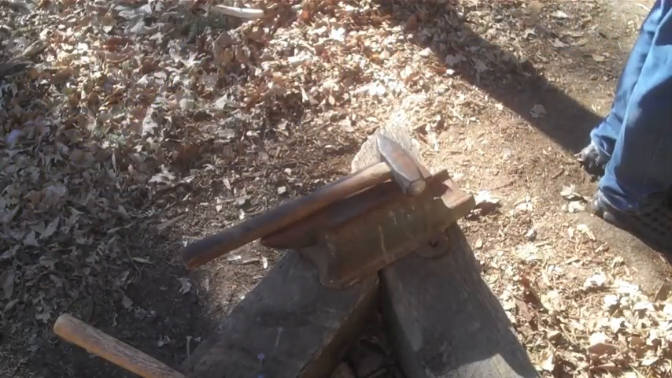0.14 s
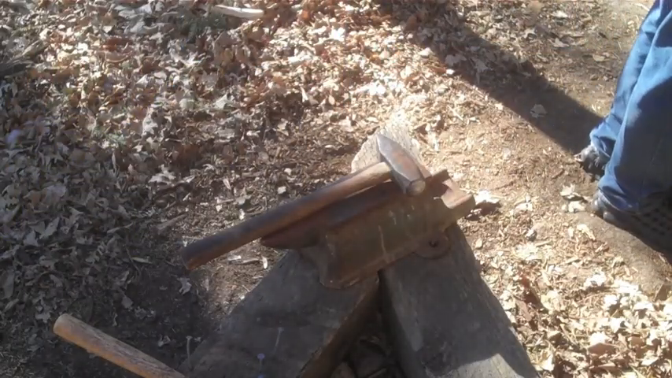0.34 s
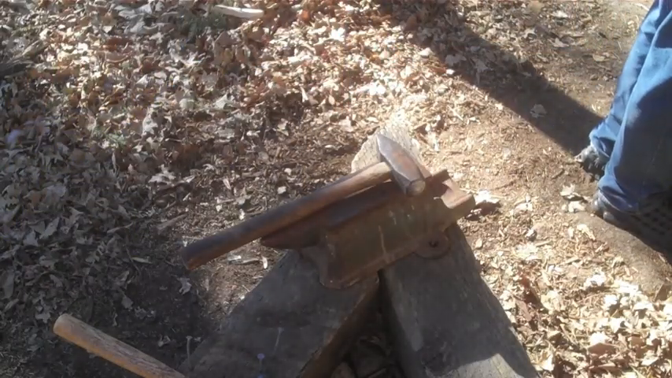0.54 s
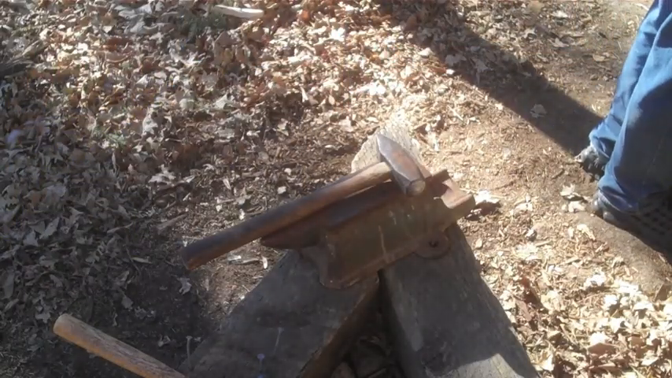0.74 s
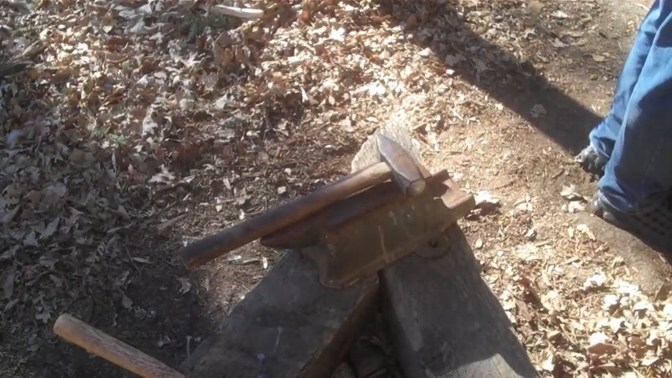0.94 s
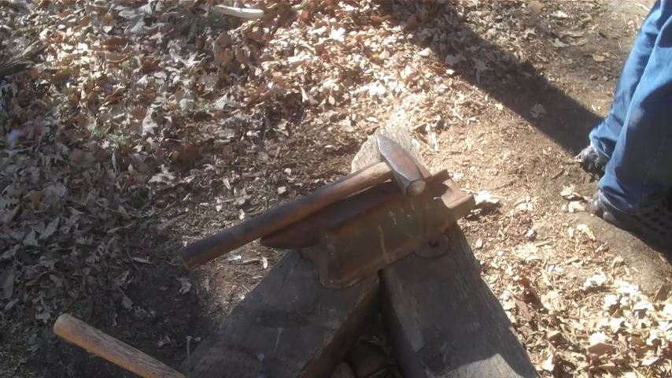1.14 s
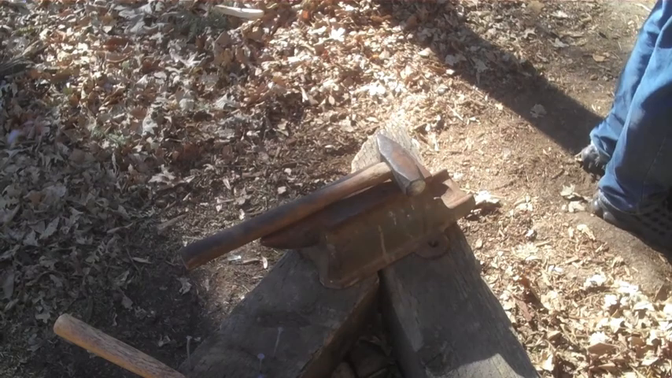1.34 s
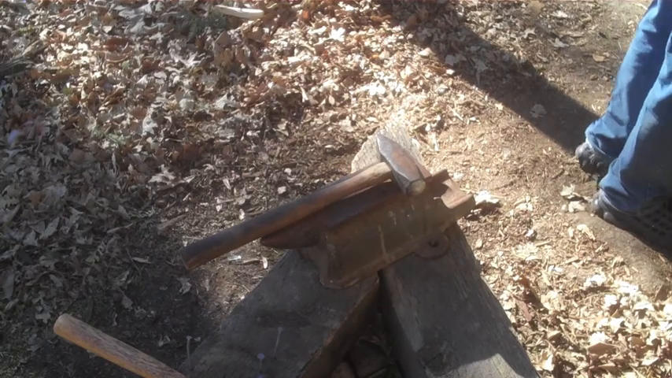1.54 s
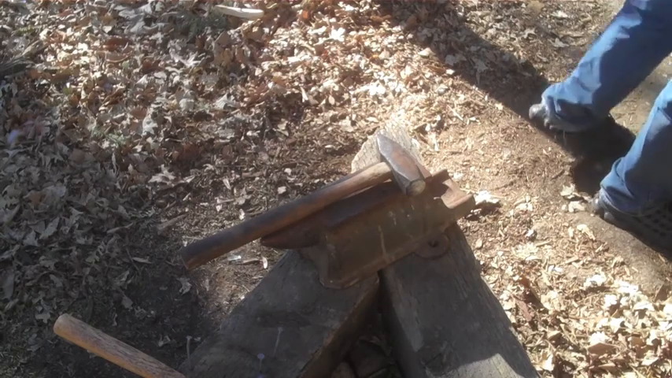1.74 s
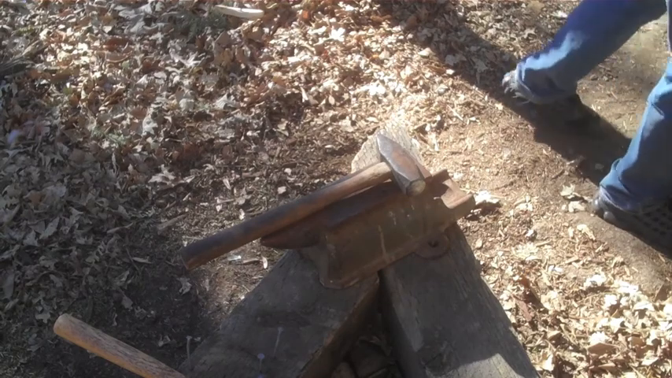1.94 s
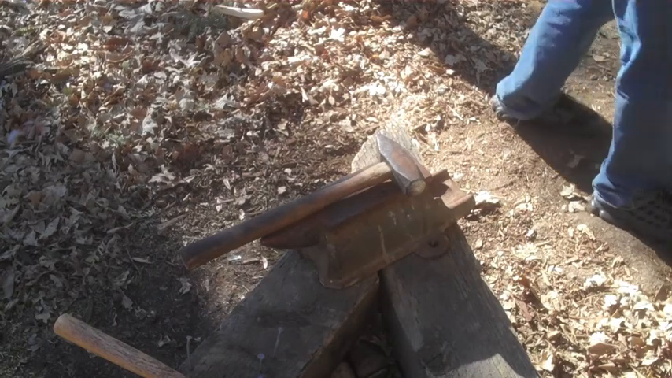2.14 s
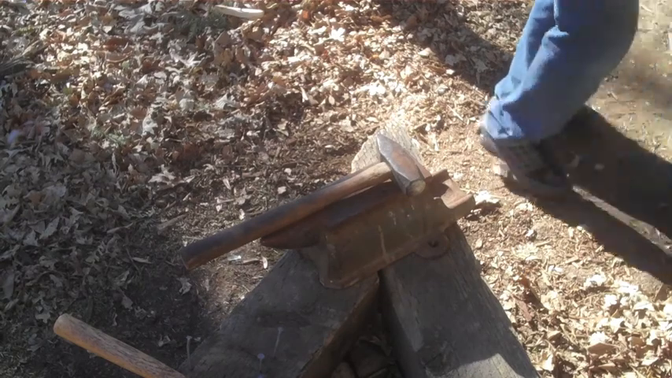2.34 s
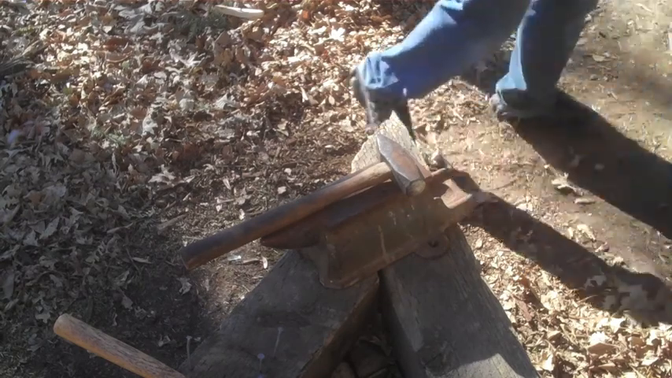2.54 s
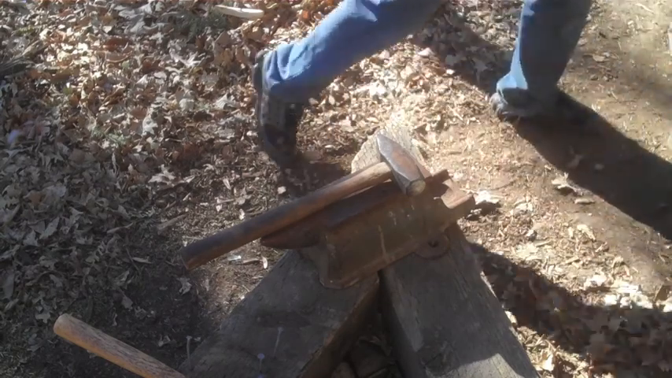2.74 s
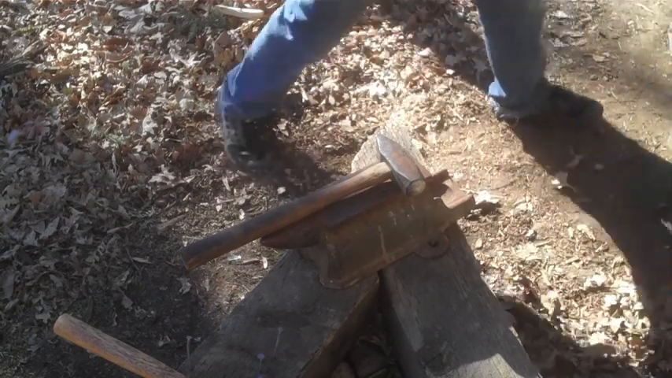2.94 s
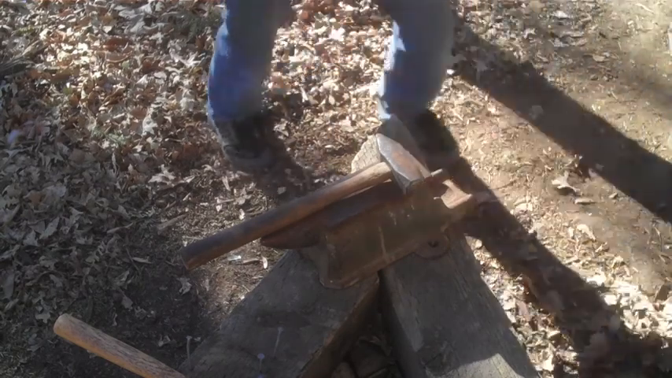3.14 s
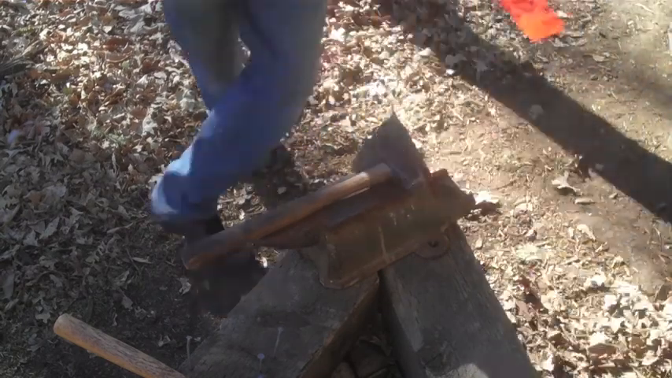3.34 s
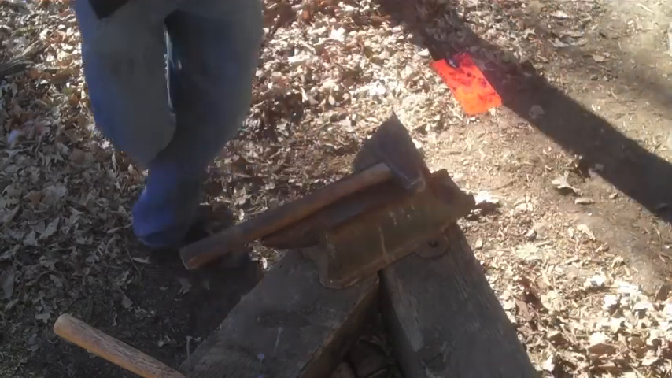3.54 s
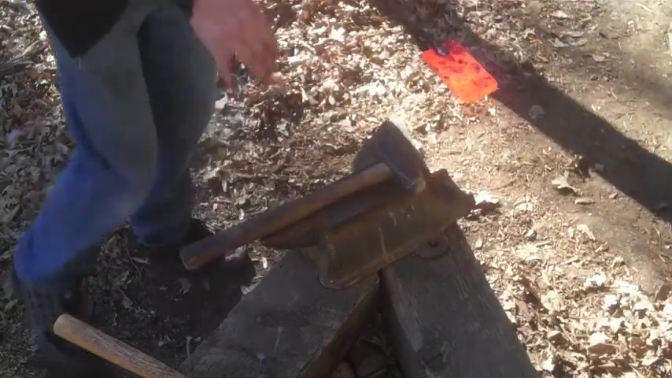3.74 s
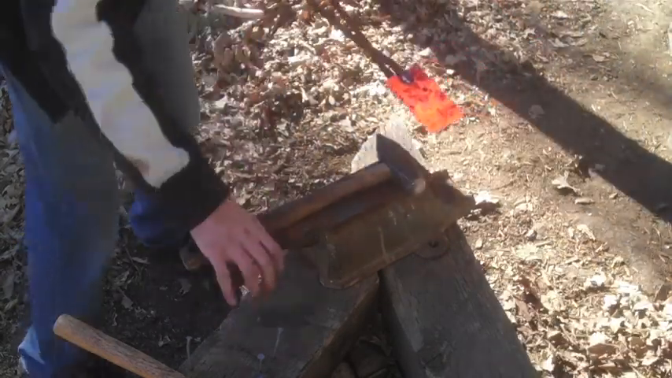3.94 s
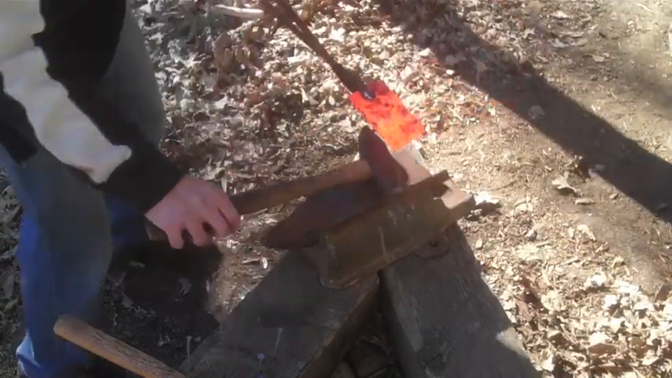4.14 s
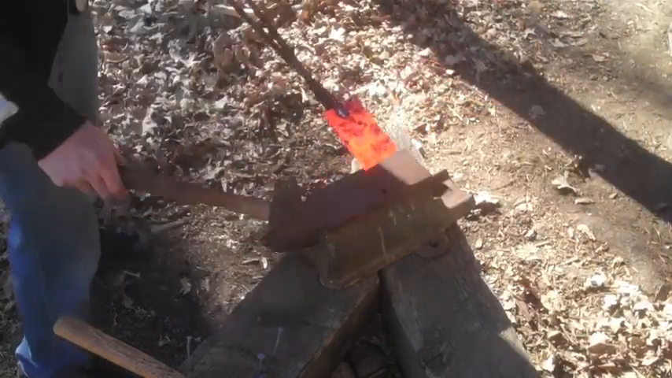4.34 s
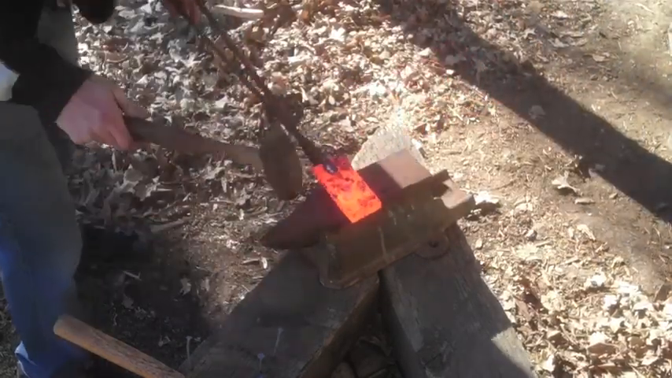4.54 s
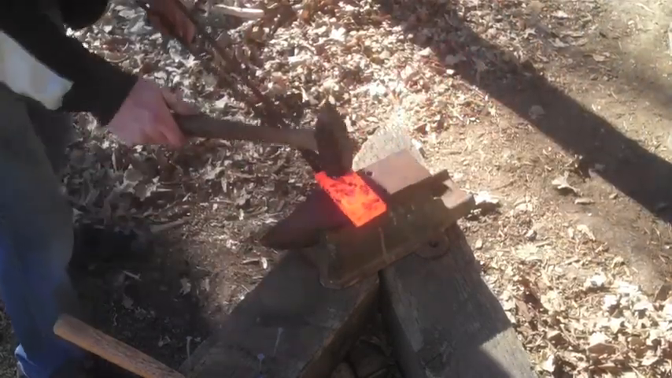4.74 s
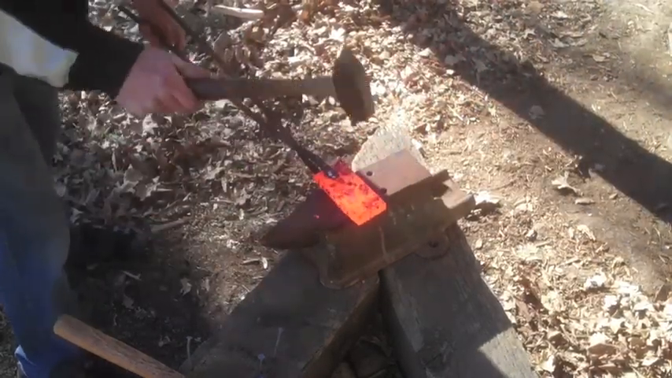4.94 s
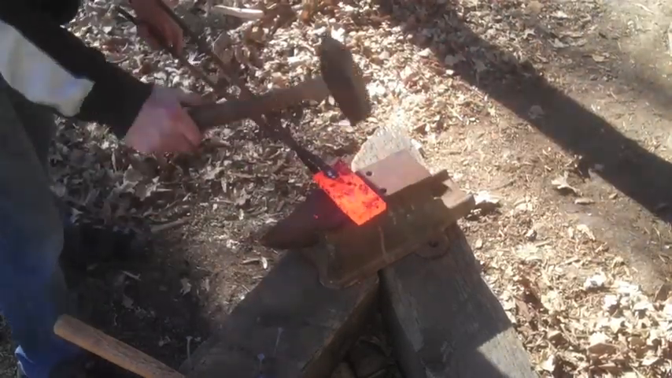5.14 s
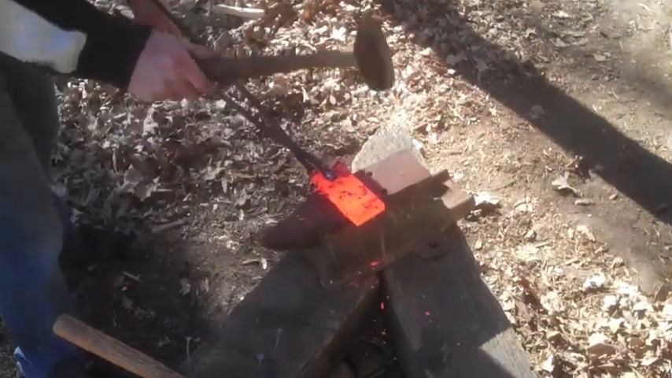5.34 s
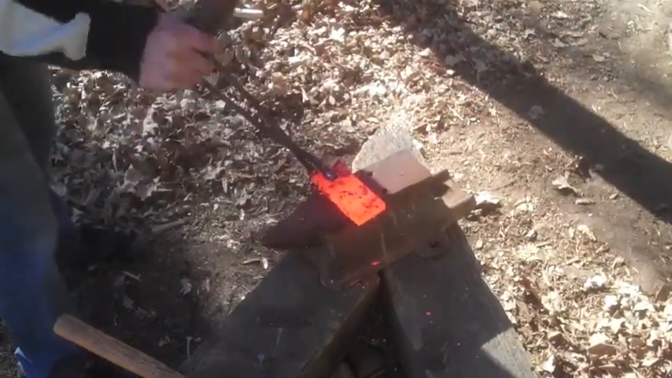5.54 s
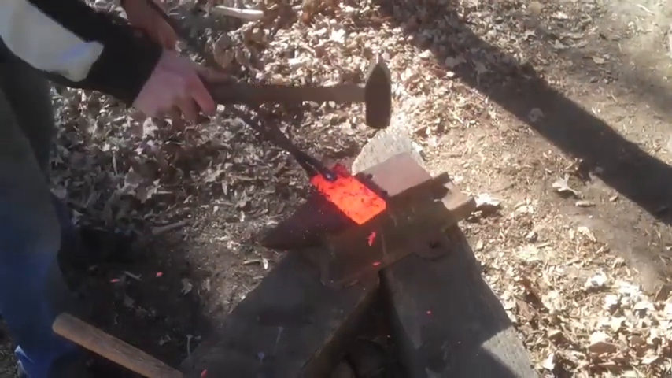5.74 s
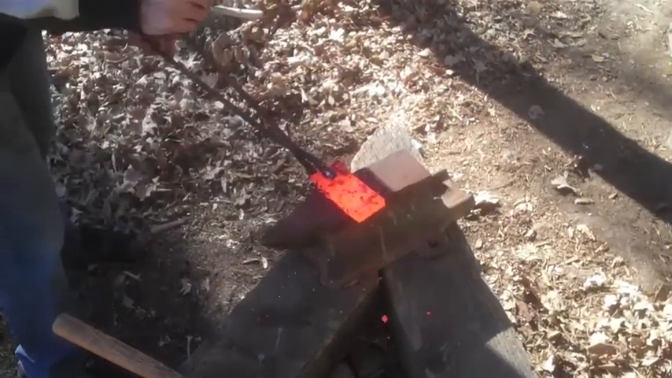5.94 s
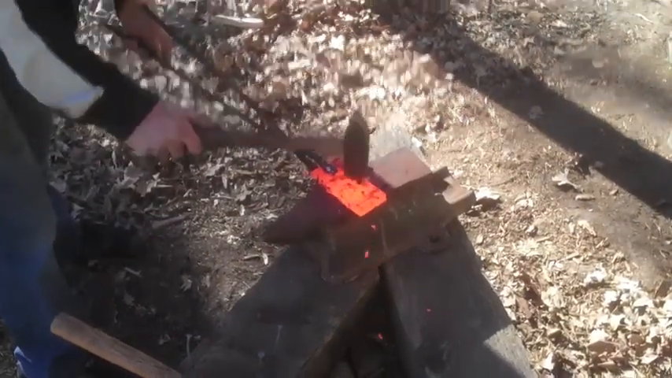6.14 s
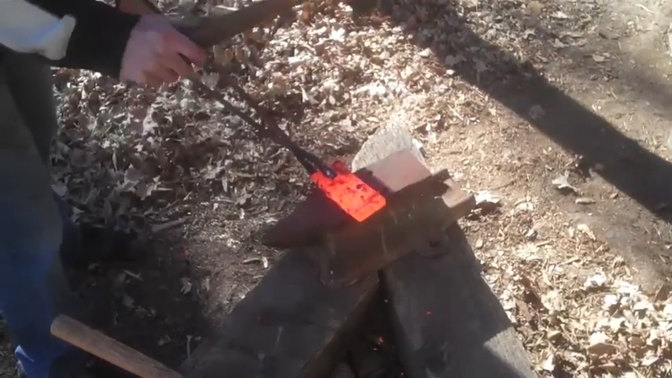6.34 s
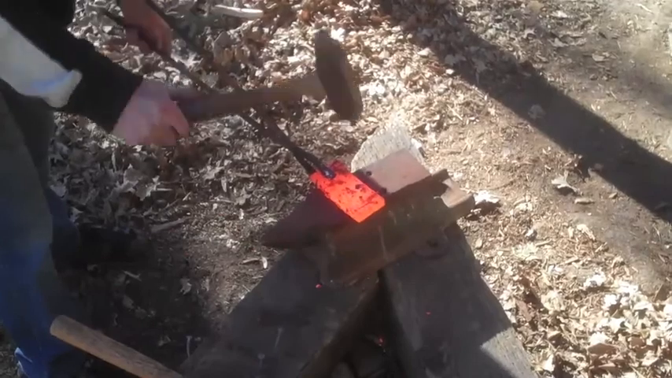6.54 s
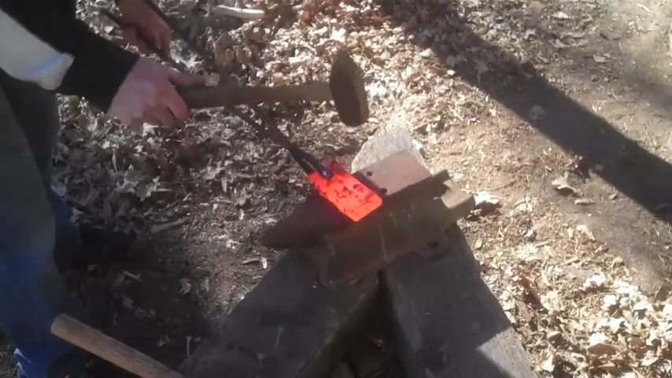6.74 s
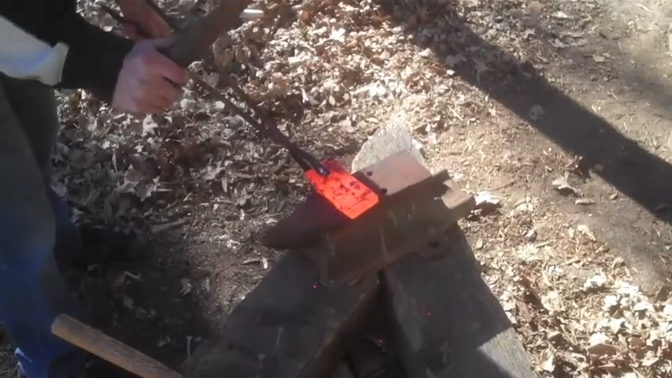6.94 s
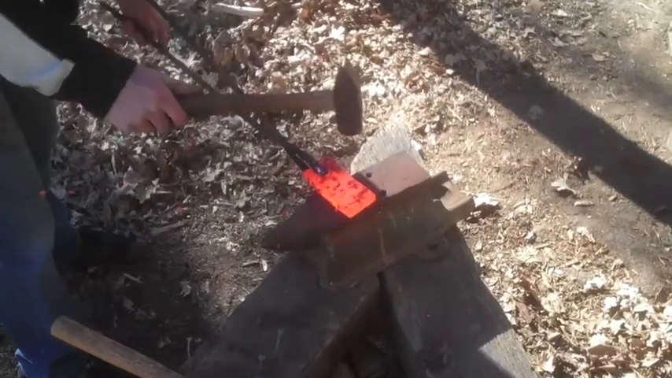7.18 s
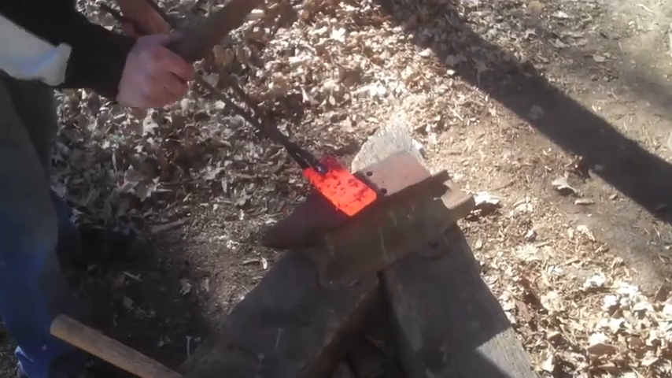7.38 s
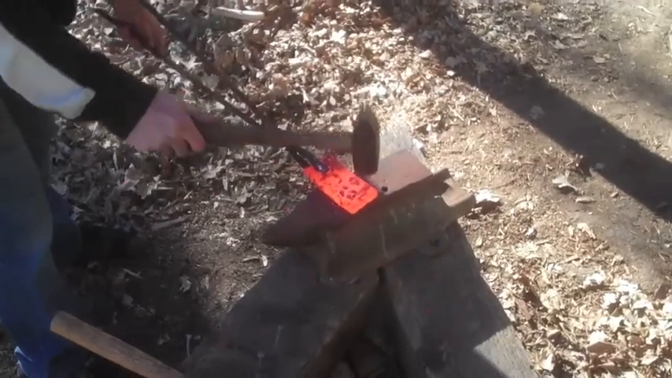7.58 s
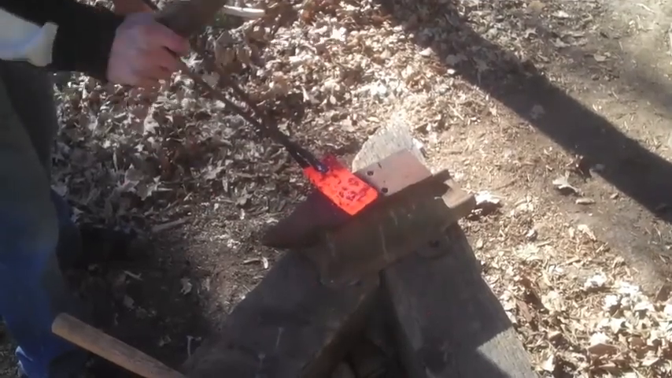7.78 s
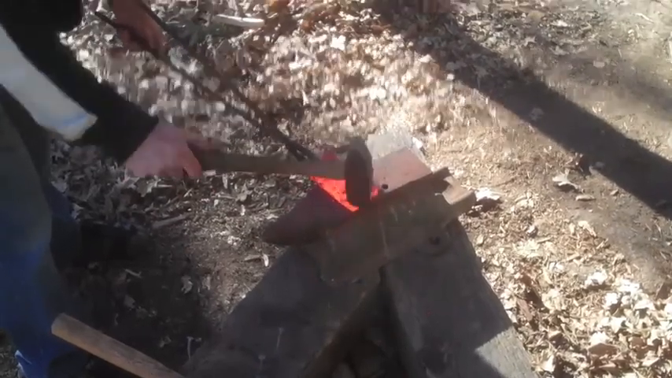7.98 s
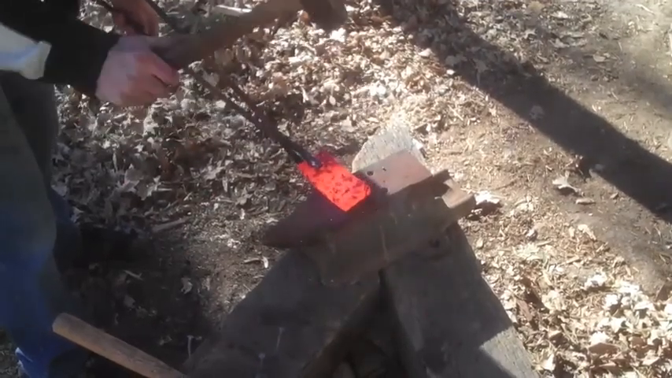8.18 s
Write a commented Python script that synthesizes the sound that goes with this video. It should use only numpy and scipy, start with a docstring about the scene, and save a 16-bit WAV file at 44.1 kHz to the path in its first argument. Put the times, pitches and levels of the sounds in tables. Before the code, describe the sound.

Footsteps crunch through dry leaves with a few fire pops, a hammer clanks on a small anvil, then seven ringing blows land, steadily spaced and weakening.

```python
"""A smith steps through dry leaves, scuffing and crackling (clumped noise grains), over a murmur of moving air.
Twigs tick (short noise bands) and bumped tools knock (blurred notes) throughout; early on a fire pops (noise
bursts). At a small anvil outdoors he picks up the hammer with a loud clank: crack, ringing modes, stand's thud.
Steel slides (grating noise and resonances) as he lays the hot piece down in its tongs and strikes it seven
times; scale patters down. The blows overload the close microphone, and the trees answer faintly."""
import sys
import numpy as np
from scipy import signal
from scipy.fft import rfft, irfft, next_fast_len
from scipy.io import wavfile
from scipy.ndimage import map_coordinates

SR = 44100
rng = np.random.default_rng(int(sys.argv[2]) if len(sys.argv) > 2 else 0)


def int16_out(signal):
    """Quantize to a 16-bit WAV file."""
    q = np.round(np.clip(np.atleast_2d(signal).T, -1, 1) * 32767)
    wavfile.write(sys.argv[1], SR, q.astype(np.int16))


N = 362061  # length [samples]

# All levels in the tables are relative mix levels.
# a foot shifts or lands in the leaves: (time of full weight [s], scuff level [dB], leaf rustle level [dB],
# rise over 20 dB [s], fall over 20 dB [s])
STEPS = [(0.012, -62.5, -40.5, 0.031, 0.044), (0.15, -53, -58.5, 0.26, 0.32),
         (0.52, -54, -55, 0.027, 0.0446), (0.645, -56.5, -54, 0.0265, 0.12),
         (0.77, -61, -50, 0.034, 0.3339), (0.95, -57.5, -41.5, 0.025, 0.0735),
         (1.11, -50.5, -62, .06, 0.16), (1.585, -50, -55.5, 0.104, 0.0917), (1.9, -56, -58, 0.021, 0.1573),
         (2.2, -52.5, -41, 0.0646, 0.0965), (2.233, -32.5, -36.5, 0.0079, 0.0933),
         (2.385, -61.5, -39.5, 0.022, 0.08), (2.569, -54, -61, 0.0106, 0.0547),
         (2.8, -62, -48.5, 0.106, 0.04), (2.99, -55.5, -41.5, 0.109, 0.1121),
         (3.06, -46.5, -34.5, 0.0686, 0.1086), (3.3, -57.5, -47.5, 0.092, 0.25),
         (3.37, -45.5, -50, 0.0605, 0.0066), (3.418, -43.5, -43, 0.016, 0.11),
         (3.58, -55, -43, 0.205, 0.2222), (3.87, -46.5, -44, 0.1025, 0.136)]
# leaf litter that keeps stirring until the smith stands still: (time [s], rustle level [dB])
LITTER_STIR = [(0, -64.5), (1.4, -64.5), (1.8, -75), (2.1, -58.5), (2.65, -64.5), (3.3, -59), (4.4, -61),
               (5.7, -57.5), (6.5, -68), (7.4, -72.5), (8.2, -76)]
STIR_SCUFF_DB = -13  # dirt against leaves, ahead of the scuff boost in the mix
# spectra of crushed leaves and scuffed dirt: (frequency [Hz], level per Hz [dB])
LEAF_SPECTRUM = [(500, -30), (1200, -2.5), (3600, 1), (6000, -1.5), (8000, -6), (11500, -17),
                 (13000, -33.5), (15000, -59.5)]
SCUFF_SPECTRUM = [(60, -14), (200, -13), (400, -4.5), (700, 0.5), (1000, 1), (1500, -4.5), (2000, -6.5),
                  (3000, -11.5), (6000, -39)]
# the low outdoor murmur over time: (time [s], level [dB])
MURMUR_LEVEL = [(0, -60.5), (1.3, -60), (1.7, -66.5), (3.9, -63.5), (4.45, -67), (5.0, -60), (6.5, -71),
                (7.4, -77), (8.2, -75)]
# spectrum of the moving air: (frequency [Hz], level per Hz [dB])
AIR_SPECTRUM = [(12, -32.5), (20, -1.5), (72, 2.5), (139, -10), (256, -5.5), (398, -10), (620, -11),
                (1350, -19.5), (7930, -23.5), (12000, -31), (15000, -75.5)]
# soft knocks of tools being handled: (time [s], level [dB], pitch [Hz], 60 dB decay [s])
KNOCKS = [(0.052, -36.5, 1439, 0.114), (0.222, -38.5, 690, 0.128), (2.57, -42.5, 2753, 0.204),
          (5.126, -39, 849, .1), (7.492, -42, 1500, 0.0378)]
# the loudest snaps of leaves, twigs and flakes of scale: (time [s], level [dB], centre frequency [Hz])
SNAPS = [(0.1356, -26.5, 3200), (0.643, -35.5, 3480), (0.9393, -29.5, 5160), (1.089, -35, 3950),
         (1.130, -27.5, 6240), (1.2466, -40, 4100), (1.6564, -34.5, 2950), (1.9031, -26.5, 3250),
         (1.9586, -37.5, 4620), (1.9921, -38, 5000), (2.147, -29.5, 2160), (2.235, -23, 3040),
         (2.383, -25.5, 5800), (2.9801, -23.5, 6360), (3.0011, -18, 6240), (3.4143, -28.5, 2980),
         (3.5885, -16, 4680), (3.8043, -29, 5000), (4.6418, -33, 3670), (4.6557, -35.5, 3180),
         (4.9556, -36, 3100), (5.1071, -31.5, 3834), (5.3199, -29.5, 3600), (5.365, -30.5, 4584),
         (5.5277, -33.5, 7000), (5.5542, -35, 2920), (5.7334, -26, 3280), (5.7674, -24.5, 3555),
         (5.7825, -22, 3295), (6.2502, -31.5, 2600), (6.316, -36.5, 5580), (6.3456, -35, 2806),
         (6.9033, -45.5, 3666), (6.9575, -45, 3450)]
# the break itself; the crumbs that follow
SNAP_T60_S, SNAP_TAIL_DB, SNAP_TAIL_T60_S = 0.01124, -25, 0.089
TICK_HZ, TICK_OCTAVES = 4000, .45  # centre of the small ticks and its spread
LITTER_DB, LITTER_UNTIL_S = -45, 5.5  # small ticks of leaves settling underfoot
# least thud that throws scale; a flake against the thud; spread of all the small ticks
FORGING_DB, FLAKE_DB, TICK_SCATTER_DB = -15, -42, 2.5
# shortest and longest flight; late flakes land farther away
FLIGHT_S, FLAKE_FADE_DB_PER_S = (0.074, 0.38), 20
# pops of the fire: (time [s], peak level [dB], level of the spray that follows [dB])
POPS = [(1.395, -2.5, -37), (1.397, -10, -30.5), (1.4955, -16, -45.5)]
# spectrum of a pop: (frequency [Hz], level per Hz [dB])
POP_SPECTRUM = [(35, -38.5), (60, -7), (526, -10), (1030, -6.5), (1270, -12), (3120, -1), (9020, -4.5),
                (13100, -15), (15000, -31.5)]
# steel on steel: (time [s], thud level [dB], thud pitch [Hz], crack level [dB], main ring level [dB],
# centre modes level [dB], overtones level [dB], tongs level [dB])
BLOWS = [(4.001, -47, 356, -37, -38, -63, -57, -51.5), (4.021, -27.5, 375, -35.5, -25, -52.5, -48, -45),
         (4.0761, -18, 164, 3.5, 10.5, -10.5, -15, -21), (4.170, -36, 352, -47, -21.5, -54.5, -57, -44.5),
         (4.2532, -28.5, 336, -27.5, -24.5, -37.5, -31, -27),
         (4.572, -27.5, 339, -29, -34.5, -59.5, -48.5, -33), (4.829, -5, 299.7, -20, -26.5, -39, -31, -28),
         (5.209, 4, 359.3, 9.5, 10.5, -16.5, -16, -15.5), (5.658, 4, 366.4, 3.5, 2.5, -16, -22.5, -25.5),
         (6.1335, 0.5, 373.1, 4, 3, -26, -12.5, -23), (6.606, -6, 351.7, -4, -8.5, -40, -25, -32.5),
         (7.068, -9.5, 373, -4.5, -21.5, -46.5, -16, -41), (7.517, -9, 365.7, -8, -15, -44.5, -19, -35),
         (7.9681, -9.5, 372, -7.5, -11.5, -37, -22, -36.5)]
RING_HZ = 2311  # main mode of the anvil
# anvil overtones, strongest under a blow near the edge: (frequency [Hz], level [dB], 60 dB decay [s])
ANVIL_OVERTONES = [(2466, -1, .15), (2512, -7, .15), (3165, -11, .14), (3600, 0, .125), (3622, -12, .16),
                   (3720, -10, .13), (4441, -7, .135), (4759, -19, .11), (5187, -14, .13), (5622, -11, .13),
                   (5983, -19, .1), (7381, -20, .11), (7830, -23, .08)]
# modes that join the main one under a central blow: (frequency [Hz], level [dB], 60 dB decay [s])
CENTRE_MODES = [(3299, 0, .21), (4038, -7, .12), (4450, -5, .08), (6334, -11, .08)]
# the tongs with the workpiece: (frequency [Hz], level [dB], 60 dB decay [s])
TONGS_MODES = [(980, -7, .15), (1208, -1, .18), (1373, -11, .15), (1451, -5, .16), (1792, -4, .21),
               (1925, -13, .17), (1981, -12, .11)]
# the timber stand: (frequency [Hz], level [dB], 60 dB decay [s])
STAND_MODES = [(35.013, -37, 0.23), (91, -30, 0.2), (124, -28.5, 0.17), (278.02, -28.5, .16),
               (377.8, -17, .1), (502.1, -22, 0.21), (570, -21.5, 0.22), (690.9, -23, 0.2), (936, -27, .13)]
# a harder contact presses longer and damps the main ring: (crack level [dB], 60 dB decay [s])
DAMPING = [(-27, .28), (-6.5, .16), (4, 0.1104)]
# spectrum of a contact's crack: (frequency [Hz], level per Hz [dB])
CRACK_SPECTRUM = [(40, -10), (150, -1.5), (380, -2.5), (500, 1.5), (700, 3.5), (1200, 0.5), (1800, -5),
                  (2500, -1), (4000, -0.5), (5500, -2.5), (7000, -8.5), (12000, -32), (15000, -36.5)]
# echo decay of the near surroundings, then of the trees: (frequency [Hz], 60 dB decay [s])
NEAR_DECAY = [(80, 0.35), (210, 0.42), (560, .16), (1500, 0.21), (4000, .14), (10000, 0.17)]
TREES_DECAY = [(60, 0.87), (500, 0.68), (1500, 0.71), (4000, 0.38), (10000, 0.29)]
# tone of the trees' answer: (frequency [Hz], level [dB])
TREES_COLOUR = [(40, -2), (250, -19.5), (500, 2.5), (1200, -1), (2300, -3.5), (4000, -5.5), (10000, 8.5)]
# slides on the anvil, first the hammer head, then the workpiece: (start time [s], length [s], level [dB])
SLIDES = [(4.021, .08, -44.5), (4.63, .03, -50), (4.86, .04, -45), (8.088, .15, -48)]
SLIDE_RISE_S, SLIDE_FALL_S = 0.0487, .1  # each over 20 dB
TOP_HZ = 15000  # band limit


def amp(db):
    """Decibels to a gain."""
    return 10 ** (np.asarray(db) / 20)


def unit(x):
    """x scaled to rms 1."""
    return x / np.sqrt(np.mean(x ** 2) + 1e-20)


def along(points, hz):
    """Read a curve of (frequency [Hz], value) points on a log frequency axis."""
    f, v = np.transpose(points)
    return np.interp(np.log(hz + 1), np.log(f + 1), v)


def curves(rows):
    """One value per sample for each column after the time."""
    s, *cols = np.transpose(rows)
    return [np.interp(np.arange(N) / SR, s, c) for c in cols]


def add(track, s, sound):
    """Mix a stereo sound into the track at time s."""
    part = track[:, round(s * SR):][:, :sound.shape[1]]
    part += sound[:, :part.shape[1]]


def filtered(x, response):
    """Shape x by a response of frequency."""
    n = x.shape[-1]
    m = next_fast_len(n + 4096)
    spectrum = rfft(x, m) * response(np.fft.rfftfreq(m, 1 / SR))
    return irfft(spectrum, m)[..., :n]


def coloured(x, spectrum):
    """Give x the spectrum's colour, at rms 1."""
    return unit(filtered(x, lambda hz: amp(along(spectrum, hz))))


def pair(n, side_db):
    """White noise as two close microphones hear it: a shared middle and an opposed side."""
    mid, side = rng.standard_normal((2, n)) * [[1], [amp(side_db)]]
    return unit(np.array([mid + side, mid - side]))


def wobble(rate):
    """A smooth random curve, rate knots a second."""
    knots = rng.standard_normal(int(N * rate / SR) + 4)
    return map_coordinates(knots, [np.arange(N) * rate / SR])


def swell(s, hold, rise, fall):
    """A gain that climbs to 1 at time s, holds and dies away; rise and fall are times for a factor of ten."""
    t = np.arange(N) / SR - s
    tens = np.minimum(0, np.minimum(t / rise, (hold - t) / fall))
    return np.exp(np.maximum(np.log(10) * tens, -20))


def ring(modes, t, scatter_db, phase_spread, blur):
    """Fading modes, struck at new strengths, slightly out of step at the two microphones.
    Loose steel chatters against them, which widens each line by the share blur of its frequency."""
    hz, db, t60 = np.transpose(modes)[:, :, None]
    size, phase, step = rng.standard_normal((3, len(modes), 1))
    jitter = rng.standard_normal((len(modes), len(t)))
    drift = np.cumsum(jitter, 1) * np.sqrt(2 * np.pi * abs(blur) * hz / SR)
    fade = amp(db + scatter_db * size - 60 * t / t60)
    angle = 2 * np.pi * (hz * t + phase) + drift
    return np.array([(fade * np.sin(angle + way * phase_spread * step)).sum(0) for way in (1, -1)])


def fractures(rate, spread_db):
    """Tiny breaks, on average rate a second, come in clumps; a few are much larger."""
    clumps_db = 2 * wobble(45)
    sizes = amp(clumps_db + spread_db * np.minimum(rng.exponential(size=N), 5))
    breaks = sizes * (rng.random(N) < rate / SR)
    # each break fades by a factor e in 0.89 ms
    grains = signal.lfilter([1], [1, -np.exp(-1 / (0.00089 * SR))], breaks)
    return unit(grains * pair(N, side_db=-2.5))


def steps():
    """Soles scuff the dirt and crush dry leaves into many tiny fractures; powers of all the steps add."""
    stir = amp(curves(LITTER_STIR)[0])
    rustle_power = stir ** 2
    scuff_power = (stir * amp(STIR_SCUFF_DB)) ** 2
    for s, scuff_db, rustle_db, rise, fall in STEPS:
        weight = swell(s, 0, rise, fall)
        rustle_power = rustle_power + (amp(rustle_db) * weight) ** 2
        scuff_power = scuff_power + (amp(scuff_db) * weight) ** 2
    rustle = coloured(fractures(rate=2200, spread_db=3.8), LEAF_SPECTRUM)
    scuff = coloured(fractures(rate=6900, spread_db=2), SCUFF_SPECTRUM)
    return np.sqrt(rustle_power) * rustle + amp(3) * np.sqrt(scuff_power) * scuff


def air():
    """A low outdoor murmur of moving air: coloured noise under a slow level curve."""
    return amp(curves(MURMUR_LEVEL)[0] + 6) * coloured(pair(N, side_db=-9.5), AIR_SPECTRUM)


def knocks():
    """A lightly bumped tool gives one blurred, quickly fading note."""
    out, t = np.zeros((2, N)), np.arange(SR // 4) / SR
    onset = 1 - np.exp(-t / 0.00183)
    for s, db, hz, t60 in KNOCKS:
        note = ring([(hz, db, t60)], t, scatter_db=0.5, phase_spread=.2, blur=.1)
        add(out, s, note * onset)
    return out


def small_ticks():
    """Rows like SNAPS for the faint ticks: leaves settle at random; scale lands after each firm contact."""
    ticks = [(s, LITTER_DB) for s in rng.uniform(0, LITTER_UNTIL_S, size=14)]
    for s, thud_db, *_ in BLOWS:
        flights = rng.uniform(*FLIGHT_S, size=5)
        if thud_db > FORGING_DB:  # the harder the blow, the louder its flakes
            for flight in flights:
                ticks.append((s + flight, thud_db + FLAKE_DB - FLAKE_FADE_DB_PER_S * flight))
    chance = rng.standard_normal((len(ticks), 2))
    return [(s, db + TICK_SCATTER_DB * a, TICK_HZ * 2 ** (TICK_OCTAVES * b))
            for (s, db), (a, b) in zip(ticks, chance)]


def snaps():
    """Brittle things break with a tick: a short band of noise around their own pitch."""
    out, t = np.zeros((2, N)), np.arange(SR // 8) / SR
    fade = amp(-60 * t / SNAP_T60_S) + amp(SNAP_TAIL_DB - 60 * t / SNAP_TAIL_T60_S)
    for s, db, centre_hz in SNAPS + small_ticks():
        band = lambda f: 1 / np.hypot(1, 2.5 * (f / centre_hz - centre_hz / (f + 1)))
        tick = unit(filtered(pair(len(t), side_db=-6), band))
        add(out, s, amp(db - 3) * tick * fade)
    return filtered(out, lambda hz: amp(along([(9000, 0), (12000, -4.5), (15000, -16)], hz)))


def fire():
    """A pop is a very short burst of noise with a brief tail and a spray of sparks."""
    out, t = np.zeros((2, N)), np.arange(SR // 4) / SR
    for s, db, spray_db in POPS:
        burst = amp(db - 4.5 - 60 * t / 0.01624)
        tail = amp(db - 34 - 60 * t / 0.032)
        spray = amp(spray_db + 4.5 - 60 * t / 0.182)
        add(out, s, (burst + tail + spray) * coloured(pair(len(t), side_db=-1), POP_SPECTRUM))
    return out


def echo(x, decay, colour, side_db):
    """x scattered outdoors, 6 ms late: each frequency dies at its own speed."""
    hz, t, z = signal.stft(pair(SR, side_db), SR, nperseg=256)
    fading = z * amp(-60 * t / along(decay, hz)[:, None])
    tail = signal.istft(fading, SR, nperseg=256)[1]
    tail = unit(tail) / np.sqrt(tail.shape[1])
    tail = filtered(tail, lambda f: amp(along(colour, f)))
    return signal.fftconvolve(x, np.pad(tail, ((0, 0), (round(.006 * SR), 0))), axes=1)


def shove(t, hz, peak, width):
    """A few low cycles under a bell-shaped gain, strongest at time peak."""
    return np.cos(2 * np.pi * hz * (t - peak)) * np.exp(-((t - peak) / width) ** 2)


def hammer():
    """Each contact cracks, rings anvil and tongs, and shoves the timber stand for a few cycles."""
    out, t = np.zeros((2, N)), np.arange(SR // 2) / SR
    blur, apart_db = .002, -10
    chatter_spectrum = [(200, -13), (450, -3.5), (1300, 0.5), (2200, 8), (4000, -13), (10000, -30)]
    near_colour = [(100, -2), (330, -5.5), (600, -0.5), (2300, -1.5), (8000, -0.5)]
    for s, thud_db, thud_hz, crack_db, ring_db, centre_db, over_db, tongs_db in BLOWS:
        push = shove(t, thud_hz, peak=.0042, width=0.002975)
        push = push - amp(-8.0) * shove(t, hz=650.1, peak=.0048, width=0.0029)
        stand = ring(STAND_MODES, t, scatter_db=2.5, phase_spread=0.13, blur=0.022)
        stand = stand * (1 - np.exp(-t / 0.001))
        thud = amp(thud_db) * (push + amp(-1) * stand)

        crack = coloured(pair(len(t), apart_db), CRACK_SPECTRUM)
        crack = amp(crack_db - 1) * crack * amp(-60 * t / 0.0313)

        # the main mode is damped under the hammer, then hums on faintly
        t60 = np.interp(crack_db, *np.transpose(DAMPING))
        hum = amp(-56 + 60 * t / t60 - 60 * t / 0.39)
        main = ring([(RING_HZ, 0, t60)], t, scatter_db=1.5, phase_spread=0.4, blur=0)
        main = amp(ring_db) * main * (1 + hum)
        centre = amp(centre_db) * ring(CENTRE_MODES, t, scatter_db=1.5, phase_spread=.2, blur=blur)
        overtones = amp(over_db) * ring(ANVIL_OVERTONES, t, scatter_db=1.5, phase_spread=.2, blur=blur)

        # the workpiece chatters in the jaws of the tongs
        chatter = coloured(pair(len(t), apart_db), chatter_spectrum)
        chatter = amp(-4 - 60 * t / .11) * chatter
        tongs = ring(TONGS_MODES, t, scatter_db=2, phase_spread=.25, blur=blur)
        tongs = amp(tongs_db) * (tongs + chatter)
        steel = (main + centre + overtones + tongs) * (1 - np.exp(-t / 0.00026))
        add(out, s, thud + crack + steel)

        # the small anvil beams its ring at the microphone; thud and crack spread all round
        spread = thud + crack + amp(-8) * steel
        add(out, s, amp(-13) * echo(spread, NEAR_DECAY, near_colour, apart_db))
        to_trees = spread + amp(4) * overtones
        add(out, s, amp(-29) * echo(to_trees, TREES_DECAY, TREES_COLOUR, apart_db))
    return out


def drag():
    """Sliding steel grates and keeps the anvil's modes humming: noise through their resonances."""
    modes = [(RING_HZ, 9, .14)] + ANVIL_OVERTONES

    def body(f):
        """Sum of the modes' resonances, each as narrow as its decay is long."""
        return sum(amp(db) / (1 + 1j * (f - hz) * t60 * 2 * np.pi / np.log(1000)) for hz, db, t60 in modes)

    grate = coloured(pair(N, side_db=-8), [(20, 2), (70, 2.5), (180, -9), (300, -6), (480, 6), (800, -6.5),
                                           (1250, -5), (2000, -23), (5000, -27), (12000, -44)])
    humming = unit(filtered(pair(N, side_db=-2), body))
    pressure = sum(amp(db) * swell(s, length, SLIDE_RISE_S, SLIDE_FALL_S) for s, length, db in SLIDES)
    return pressure * (grate + amp(-1.5) * humming)


def scene():
    """Pan every layer to the left of the microphones' axis, the anvil farthest."""
    left = lambda db: amp([[db / 2], [-db / 2]])  # level difference between the channels
    smith = steps() + knocks() + snaps() + fire()
    anvil = hammer() + drag()
    return (smith + air()) * left(db=5.5) + anvil * left(db=7.0)


def record(dry):
    """The blows saturate at full scale; a steep low-pass then cuts off the extreme treble."""
    clipped = dry / (1 + np.abs(dry) ** 8) ** (1 / 8)
    return signal.sosfilt(signal.butter(14, TOP_HZ, fs=SR, output="sos"), clipped)


dry = scene()
out = record(dry)
int16_out(out)
```